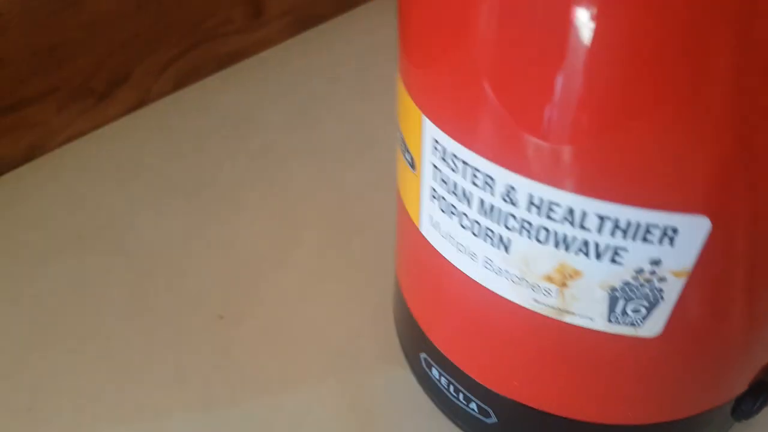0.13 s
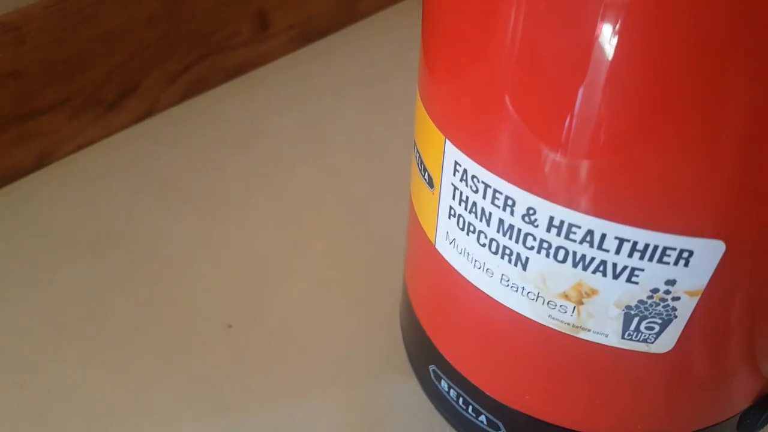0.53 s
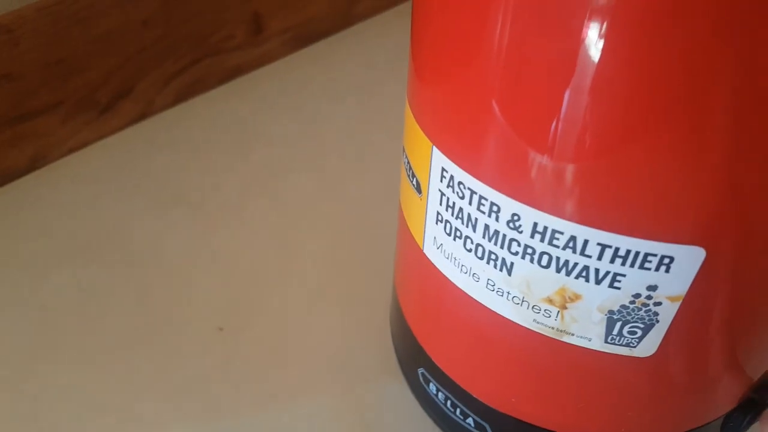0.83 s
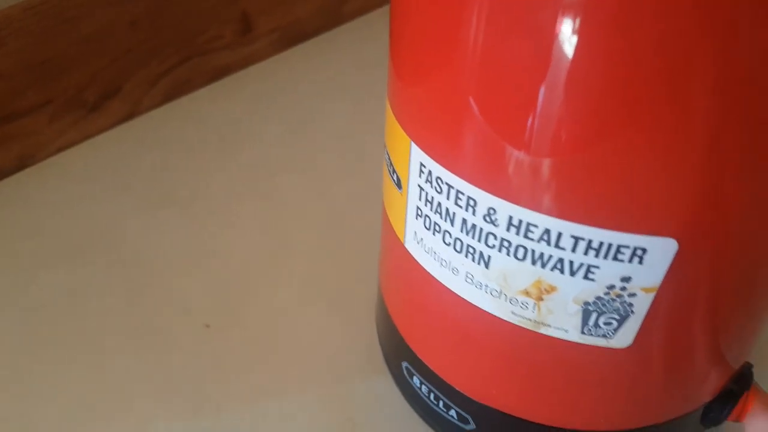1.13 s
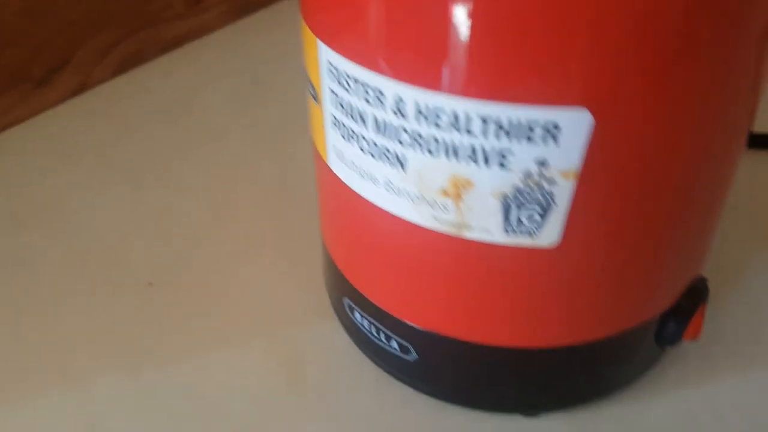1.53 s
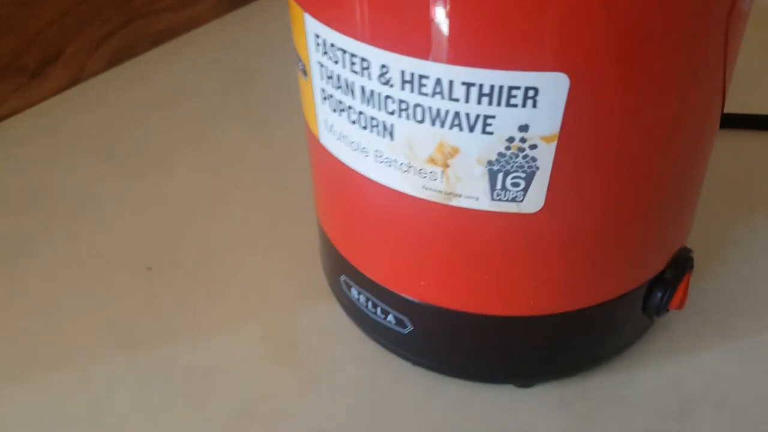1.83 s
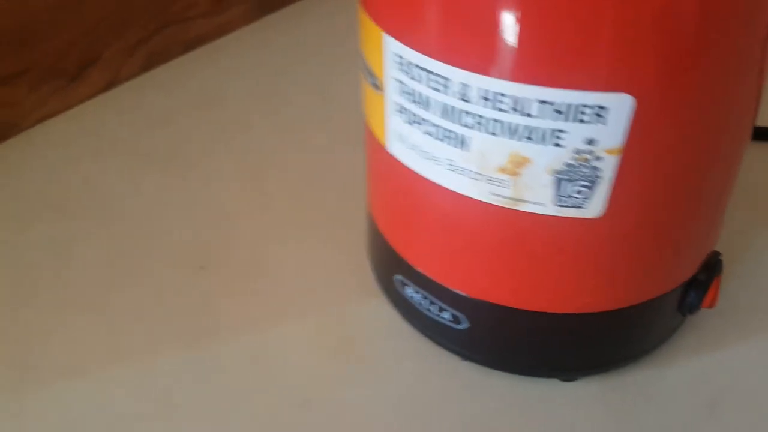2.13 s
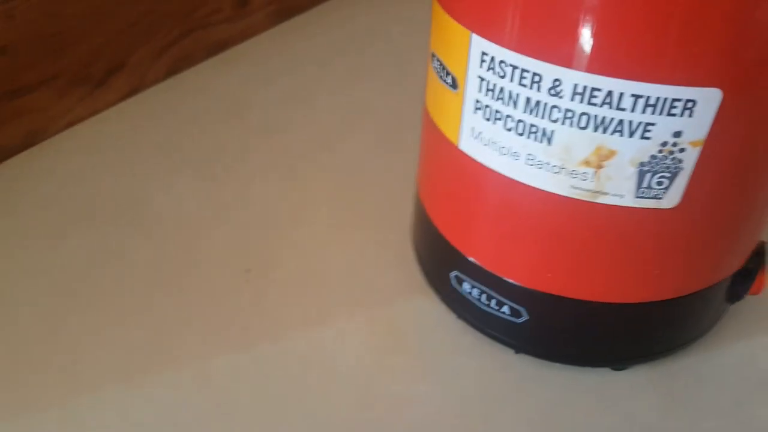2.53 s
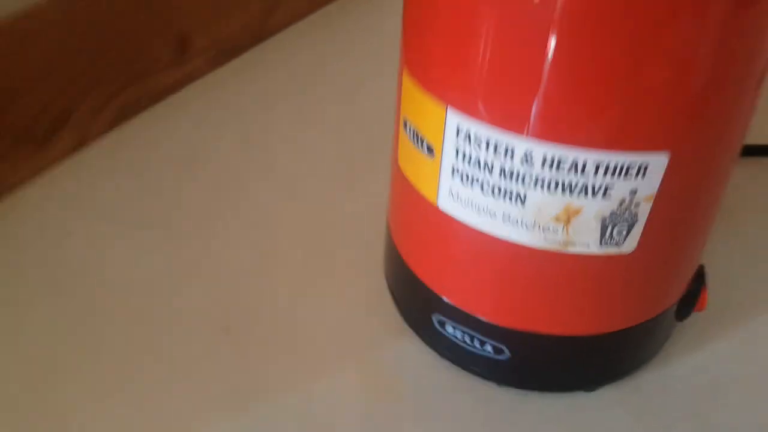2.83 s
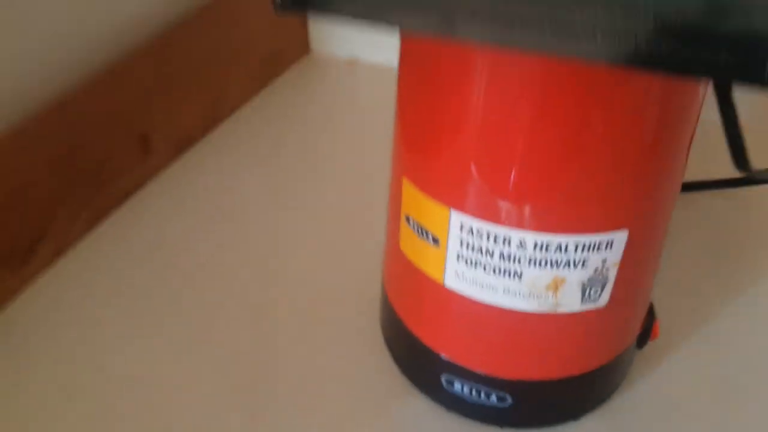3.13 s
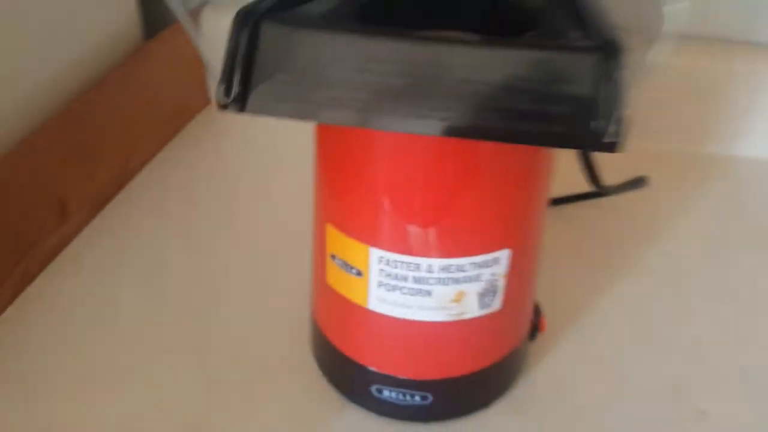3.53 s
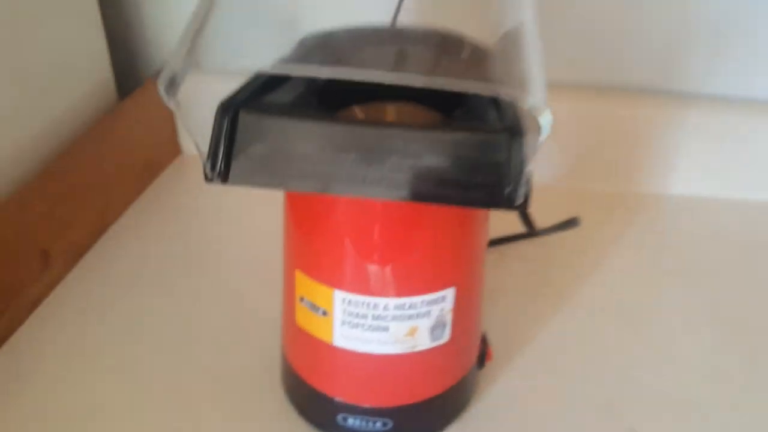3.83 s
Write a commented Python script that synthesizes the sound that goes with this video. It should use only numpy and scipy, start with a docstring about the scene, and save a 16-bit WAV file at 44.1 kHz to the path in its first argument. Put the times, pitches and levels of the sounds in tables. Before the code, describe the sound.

Close stereo phone capture of a hot-air popper: faint handling and small clicks, one hard switch snap, a rising motor whine, then steady blowing roar with swirling kernel rattle in an indoor kitchen.

```python
"""A hot-air corn popper on a kitchen counter, close to a hand-held phone. The room hums throughout (noise,
sines). A hand rubs the phone (noise swells); a finger touches the rocker switch and snaps it at 1.1 s (noise
cracks, decaying sines, echo). The motor spins up, its shaft orders (sines) climbing through the housing's
resonances; three dull bumps hit the phone; air roars through the chamber (resonant noise); kernels swirl and
rattle (gated noise). From 2.2 s the deepest bass flickers back in brief soft lumps."""
import sys
import numpy as np
from scipy import signal
from scipy.fft import rfft, irfft, next_fast_len
from scipy.io import wavfile
from scipy.ndimage import uniform_filter1d, map_coordinates

SR = 44100
rng = np.random.default_rng(int(sys.argv[2]) if len(sys.argv) > 2 else 0)


def volts_from_db(level):
    """Convert decibel levels to linear amplitude ratios."""
    exponent = np.asarray(level, float) / 20
    return 10 ** exponent


def output_pcm(signal):
    """Save a mono or channel-first signal as 16-bit PCM at the path in sys.argv[1].

    Samples are clipped to [-1, 1] before scaling.
    """
    pcm = np.clip(np.atleast_2d(signal).T, -1, 1) * 32767
    wavfile.write(sys.argv[1], SR, np.round(pcm).astype(np.int16))


N = 176400

# contacts at the switch, the last one closes it:
# (time [s], level [dB], left over right [dB], ring [dB], crack resonance [Hz], echo [dB])
TOUCHES = [(0.2347, -34.5, 11, -9.5, 4200, -25), (.629, -51, 0, 0, 2200, -24),
           (0.955, -18, -5, -27, 3640, -26), (1.0999, -8, -11, -10.5, 6130, -13.5)]
# left-right likeness of the popper: (frequency [Hz], likeness [0-1])
POPPER_ALIKE = [(60, 0.88), (150, 0.69), (380, 1), (700, 0.92), (1300, 0.56), (2400, 0.28), (5000, 0.21),
                (15000, .05)]
# left-right likeness of room and rubs: (frequency [Hz], likeness [0-1])
ROOM_ALIKE = [(60, 0.97), (240, 0.93), (950, 0.17), (3770, 0.04), (15000, 0.1)]


def unit(x):
    """Scale to rms 1."""
    return x / np.sqrt(np.mean(x ** 2) + 1e-20)


def along(points, hz):
    """Interpolate (frequency [Hz], value) points on a log frequency axis."""
    f, v = np.transpose(points)
    return np.interp(np.log(hz + 1), np.log(f + 1), v)


def curves(rows):
    """One value per sample for each column after the time."""
    s, *cols = np.transpose(rows)
    return [np.interp(np.arange(N) / SR, s, c) for c in cols]


def wobble(knots_per_s):
    """Smooth random curve through normally distributed knots."""
    knots = rng.standard_normal(int(N * knots_per_s / SR) + 40)
    return map_coordinates(knots, [np.arange(N) * knots_per_s / SR])


def filtered(x, response):
    """Apply a complex response of frequency to x."""
    m = next_fast_len(N + SR // 2)
    return irfft(rfft(x, m) * response(np.fft.rfftfreq(m, 1 / SR)), m)[..., :N]


def peaks(table):
    """Summed response of (centre [Hz], width [Hz], level [dB]) resonances."""
    return lambda f: sum(volts_from_db(db) * 1j * f * w / (c * c - f * f + 1j * f * w) for c, w, db in table)


def squared_peaks(table):
    """Resonances applied twice: steeper skirts, levels in dB doubled."""
    return lambda f: peaks(table)(f) ** 2


def colour(spectrum):
    """Response of a (frequency [Hz], level [dB]) table."""
    return lambda hz: volts_from_db(along(spectrum, hz))


def spread(pair, response, alike):
    """Colour two unrelated signals and mix them into left and right by likeness, rms 1."""
    def mid_side(hz):
        turn = np.arccos(np.clip(along(alike, hz), -1, 1)) / 2
        return response(hz) * [np.cos(turn), np.sin(turn)]
    mid, side = filtered(pair, mid_side)
    return unit(np.array([mid + side, mid - side]))


def noise():
    """Two unrelated white noises."""
    return rng.standard_normal((2, N))


def switched(rise_s):
    """0 before the switch closes, then a linear rise to 1."""
    return np.clip((np.arange(N) / SR - TOUCHES[-1][0]) / rise_s, 0, 1)


def bell(centre_s, sigma_s):
    """Gaussian swell with peak 1."""
    return np.exp(-.5 * ((np.arange(N) / SR - centre_s) / sigma_s) ** 2)


def room():
    """Low, lumpy kitchen noise and the wavering sines of a distant appliance."""
    # appliance hum: (frequency [Hz], mean level [dB rms])
    hum_tones = [(59.2, -58), (781, -63.5), (1044, -67)]
    # background spectrum, relative: (frequency [Hz], density [dB per Hz])
    room_spectrum = [(20, -28), (40, -21), (60, -14), (90, -24), (125, -5), (171, -3.5), (237, -9),
                     (310, -2), (370, -8.5), (466, -15.5), (800, -18.5), (1240, -25.5), (3550, -36),
                     (6000, -47.5), (16200, -52)]
    noise_db = -42.5
    t = np.arange(N) / SR
    hum = 0
    for hz, db in hum_tones:
        level = volts_from_db(db + 4 * wobble(9)) * np.sqrt(2)
        hum = hum + level * np.sin(2 * np.pi * hz * t + wobble(8))
    return hum + volts_from_db(noise_db + 0.4 * wobble(8.7)) * spread(noise(), colour(room_spectrum), ROOM_ALIKE)


def hand():
    """Skin friction on the phone as noise swells, dull bumps as short sine bursts."""
    # slides: (centre time [s], length, 3 sigma [s], level [dB])
    rub_events = [(0.083, 0.17, -50.5), (0.259, 0.12, -45.5), (0.422, 0.067, -50.5), (0.934, 0.035, -50),
                  (1.102, 0.015, -34)]
    # friction spectrum, relative: (frequency [Hz], density [dB per Hz])
    skin = [(500, 14.5), (1500, 5), (4000, -2), (9000, -9.5), (16000, -17)]
    # bumps: (centre time [s], pitch [Hz], level [dB], length, 3 sigma [s])
    bump_events = [(1.182, 119, -30.5, 0.028), (1.279, 112, -28, 0.027), (1.303, 49.4, -39, .04)]
    t = np.arange(N) / SR
    rub_level = sum(volts_from_db(db) * bell(s, length / 3) for s, length, db in rub_events)
    rubs = rub_level * spread(noise(), colour(skin), ROOM_ALIKE)
    bumps = sum(volts_from_db(db) * bell(s, length / 3) * np.sin(2 * np.pi * hz * (t - s))
                for s, hz, db, length in bump_events)
    return rubs + bumps


def thumps():
    """Short soft lumps of deep bass: sine bursts under Gaussian swells."""
    # (centre time [s], level [dB])
    thump_events = [(2.19, -42), (2.51, -51), (2.715, -44), (2.82, -49), (2.915, -45), (3.11, -47),
                    (3.42, -48), (3.56, -52), (3.95, -45)]
    pitch_hz, sigma_s = 52, .012
    t = np.arange(N) / SR
    return sum(volts_from_db(db) * bell(s, sigma_s) * np.sin(2 * np.pi * pitch_hz * (t - s)) for s, db in thump_events)


def switch():
    """Each contact: a lead-in tick, a noise crack, plastic modes ringing and the kitchen's noisy answer."""
    # modes of the plastic base: (frequency [Hz], level [dB], t60 [s])
    plastic = [(740, -8, .025), (1260, -3, .03), (1480, 0, .035), (1820, 0, .025), (2280, -5, .02),
               (2864, -4, .035), (3520, -2, .025), (5150, -8, .01), (6500, -6, .01)]
    # kitchen decay: (frequency [Hz], t60 [s])
    kitchen_decay = [(300, 0.15), (2500, 0.19), (8000, 0.2), (15000, 0.17)]
    # colour of the kitchen's answer: (frequency [Hz], level [dB])
    echo_colour = [(300, 7), (1200, 9.5), (2800, 11), (5000, -0.5), (9000, -2.5), (16000, -11)]
    lead_in_s, lead_in_db = 0.00143, -14.5
    crack_t60_s, resonance_db, echo_rise_s = .011, 15, 0.0012
    out, t = np.zeros((2, N + SR)), np.arange(SR // 2) / SR
    n = len(t)
    late = np.clip(t - lead_in_s, 0, None)
    crack_level = np.where(t < lead_in_s, volts_from_db(lead_in_db), volts_from_db(-60 * late / crack_t60_s))
    ring = sum(volts_from_db(db - 60 * t / t60) * np.sin(2 * np.pi * hz * t) for hz, db, t60 in plastic)
    ring = np.roll(ring, round(lead_in_s * SR))
    for s, db, pan_db, ring_db, crack_hz, echo_db in TOUCHES:
        # a shared noise plus one of its own per channel
        crack = (rng.standard_normal(n) + 0.99 * rng.standard_normal((2, n))) * crack_level
        crack = crack + volts_from_db(resonance_db) * signal.lfilter(*signal.iirpeak(crack_hz, 1.7, SR), crack)
        hz, frames, z = signal.stft(rng.standard_normal((2, n)), SR, nperseg=128)
        fade = volts_from_db(along(echo_colour, hz)[:, None] - 60 * frames / along(kitchen_decay, hz)[:, None])
        echo = signal.istft(z * fade, SR, nperseg=128)[1][:, :n]
        echo = echo * np.clip(late / echo_rise_s, 0, 1)
        hit = (0.14 * crack + volts_from_db(ring_db) * ring) * volts_from_db([[pan_db / 2], [-pan_db / 2]])
        out[:, round(s * SR):][:, :n] += volts_from_db(db) * (hit + volts_from_db(echo_db) * echo)
    # second-order high-pass at 800 Hz, first-order low-pass at 9 kHz
    return filtered(out[:, :N], lambda f: (1j * f / (800 + 1j * f)) ** 2 * 9000 / (9000 + 1j * f))


def kernels():
    """Tiny hard collisions: random decaying hits gate noise in surges over a steady hiss."""
    # swirl level before trim: (time [s], level [dB])
    swirl = [(1.24, -73), (1.54, -48.5), (1.73, -36.5), (1.83, -20.5), (1.88, -19.5), (1.9, -27),
             (1.98, -25), (2.0, -30.5), (2.06, -21), (2.08, -26.5), (2.12, -20.5), (2.17, -26), (2.19, -32),
             (2.22, -24), (3.29, -24), (3.3, -24), (3.35, -28.5), (3.49, -25.5), (3.53, -20.5),
             (3.55, -24.5), (3.65, -25), (3.67, -28.5), (3.72, -23), (3.81, -28.5), (3.82, -21),
             (3.86, -30), (3.88, -22), (4.0, -30.5)]
    # collision spectrum, relative: (frequency [Hz], density [dB per Hz])
    rattle = [(1500, -13), (2500, 1), (3400, 0), (5100, -1), (6400, -2), (8600, 2), (10100, -3),
              (13200, -3), (15700, -6.5), (16200, -11)]
    hits_per_s, hit_decay_s, hit_spread_db = 400, 0.0014, 3.5
    hiss_share, trim_db = 0.66, 0.5
    level_db, = curves(swirl)
    hits = (rng.random(N) < hits_per_s / SR) * volts_from_db(hit_spread_db * rng.standard_normal(N))
    gate = signal.lfilter([1], [1, -np.exp(-1 / (hit_decay_s * SR))], hits)
    surge_db = .3 * wobble(18) + 1.9 * wobble(80)
    rattling = unit(gate * volts_from_db(surge_db))
    grit = noise() * (hiss_share + (1 - hiss_share) * rattling) * volts_from_db(.5 * surge_db)
    return switched(0.13) * volts_from_db(level_db + trim_db) * spread(grit, colour(rattle), POPPER_ALIKE)


def air():
    """Turbulent flow: broad noise roar and noise through the resonances that the flow excites."""
    # levels before trims:
    # (time [s], roar [dB], chamber tone [dB], housing ring [dB], spout tone [dB])
    air_levels = [(1.22, -43, -62, -58, -43), (1.24, -51, -60, -33, -42), (1.37, -40, -30, -46, -30),
                  (1.42, -36, -38.5, -33, -33), (1.51, -30.5, -26, -23, -27.5), (1.6, -27, -29, -17.5, -23),
                  (1.64, -23.5, -21.5, -16, -25.5), (1.85, -21.5, -28, -19.5, -28.5),
                  (1.98, -21, -24.5, -18.5, -25), (2.02, -21.5, -26, -21.5, -39),
                  (2.47, -20.5, -27, -30, -30), (3.16, -21.5, -31.5, -23, -21.5),
                  (3.57, -22, -37, -21.5, -18), (3.62, -23, -51, -27, -20), (3.93, -23, -42, -22.5, -20),
                  (4.0, -24, -54, -24, -22)]
    # roar spectrum, relative: (frequency [Hz], density [dB per Hz])
    roar_spectrum = [(41, -60), (70, -13.5), (122, -14.5), (259, -16.5), (360, -10), (490, -5), (618, 4),
                     (793, -4.5), (857, 3), (1240, 0.5), (1960, -7), (2160, -5.5), (3400, -7.5),
                     (5000, -12.5), (7000, -19), (9100, -22), (15400, -56)]
    # resonances, relative: (centre [Hz], width [Hz], level [dB]); all but the duct's get squared
    duct_modes = [(735, 16, 2), (925, 20, 1.5), (1160, 50, -5)]
    chamber_modes = [(366.7, 38.4, -3.5), (425, 120, -1.5)]
    ring_modes = [(1532, 41, 18.5), (1666, 520, 21.5)]
    spout_modes = [(543.3, 14, -5.5), (603, 172, 5.5)]
    # trims
    flow_db, roar_db, duct_db = -4.0, 4.5, -0.5
    chamber_db, ring_db, spout_db = -1.5, -7.5, -5
    flow_curve, chamber_curve, ring_curve, spout_curve = curves(air_levels)
    roar = volts_from_db(roar_db + 0.0) * volts_from_db(0) * spread(noise(), colour(roar_spectrum), POPPER_ALIKE)
    roar = roar * volts_from_db(20 * np.log10(volts_from_db(0.1 * wobble(5.3) * 20 / 20)))
    duct = volts_from_db(duct_db + wobble(4.57)) * spread(noise(), peaks(duct_modes), POPPER_ALIKE)
    chamber = volts_from_db(chamber_curve + chamber_db) * spread(noise(), squared_peaks(chamber_modes), POPPER_ALIKE)
    ring = volts_from_db(ring_curve + ring_db) * spread(noise(), squared_peaks(ring_modes), POPPER_ALIKE)
    spout = volts_from_db(spout_curve + spout_db) * spread(noise(), squared_peaks(spout_modes), POPPER_ALIKE)
    return switched(0.17) * (volts_from_db(flow_curve + flow_db) * (roar + duct) + chamber + ring + spout)


def motor():
    """Unsteady sines on the shaft orders, weighted by the housing's resonances, plus mains buzz."""
    # shaft speed: (time [s], speed [turns/s])
    shaft_speed = [(1.1, 10), (1.17, 40), (1.24, 63), (1.3, 85), (1.35, 101), (1.49, 146), (1.59, 171),
                   (1.69, 189), (1.79, 198), (1.95, 203.3), (2.21, 206.7), (2.51, 208.4), (2.91, 209.9),
                   (4, 211)]
    # shaft orders: (multiple of shaft speed, relative level [dB])
    shaft_orders = [(1, -40), (2, -36), (3, -40), (4, -35), (5, -33.5), (6, -28.5), (7, -34.5), (8, -43),
                    (9, -39.5), (10, -35), (11, -44), (15, -42), (25, -33)]
    # what the housing lets through: (frequency [Hz], level [dB])
    housing = [(60, -51), (110, 7.5), (190, -1), (215, -12), (370, -5), (620, 3), (760, -6), (920, 3),
               (1010, -5), (1200, 3), (1400, -5), (1540, 9), (1640, 3), (1760, 9.5), (1950, 1), (2130, 7),
               (2450, -6), (5000, -45)]
    # whine level: (time [s], orders up to 5 [dB], orders 6 and 7 [dB], higher orders [dB])
    whine_levels = [(1.15, -19, -25, -34), (1.35, -11, -18, -18), (1.48, -5, -10, -2), (1.6, -1, -12, 3),
                    (1.74, -1, 1.5, -3), (2, -3, 1, -8), (2.5, 0, 2, -6), (2.9, -1, -2, -10),
                    (3.3, 3, -4, -10), (3.7, 2, -1.5, -11), (4, 0, -2, -11)]
    # mains buzz at final speed: (frequency [Hz], mean level [dB rms])
    buzz_tones = [(120, -47), (240, -56)]
    waver_db, jitter_rad = 1.8, .27
    speed, = curves(shaft_speed)
    low_db, mid_db, high_db = curves(whine_levels)
    turns, t = np.cumsum(speed) / SR, np.arange(N) / SR
    whine = 0
    for k, db in shaft_orders:
        group_db = low_db if k < 6 else mid_db if k < 8 else high_db
        unsteady_db = waver_db * wobble(9) + .5 * waver_db * wobble(30)
        level = volts_from_db(db + group_db + along(housing, k * speed) + unsteady_db)
        jitter = jitter_rad * (wobble(10) + wobble(60))
        whine = whine + level * np.sin(2 * np.pi * k * turns + jitter)
    buzz = sum(volts_from_db(db + 0.47 * wobble(9.26)) * np.sin(2 * np.pi * hz * t) for hz, db in buzz_tones)
    buzz = buzz * speed / speed[-1]
    return np.sqrt(2) * switched(0.063) * (whine + buzz) * np.ones((2, 1))


def scene():
    """The popper sits off centre: level and phase differ between the two microphones."""
    # (frequency [Hz], left over right [dB])
    sides = [(60, -5), (200, 2.5), (380, -2.5), (700, 3), (1290, 0), (2400, 1.5), (5000, -1), (9000, -1),
             (15000, 2)]
    # (frequency [Hz], phase by which left leads [rad])
    lead = [(100, 0.17), (600, 1.3), (950, 0.36), (1200, 1.5), (1460, 0.79), (4400, 1.26), (16000, 2)]
    half = np.array([[.5], [-.5]])
    popper = filtered(motor() + air() + kernels(),
                      lambda hz: volts_from_db(half * along(sides, hz)) * np.exp(1j * half * along(lead, hz)))
    return popper + switch() + room() + hand()


def top_cut(x):
    """Nothing passes above the cut-off."""
    return signal.sosfilt(signal.butter(12, 16670, fs=SR, output="sos"), x)


def record(dry):
    """While the sound is steady and loud the deep bass drops away; the top is cut and peaks clip softly."""
    low_cut_hz, low_cut_db, loud_db = 85, -24, -23
    top_hz, clip_level = 15850, .9
    power = np.abs(uniform_filter1d(np.mean(dry ** 2, 0), size=6000))
    # 0 when quiet, 0.5 at loud_db, 1 when loud
    loud = power ** 2 / (power ** 2 + volts_from_db(4 * loud_db))
    deep = filtered(dry, lambda hz: 1 / (1 + (hz / low_cut_hz) ** 8))
    removed_bass = deep * (1 - volts_from_db(low_cut_db * loud))
    mix = filtered(dry, lambda hz: hz < top_hz) - removed_bass + thumps()
    clipped = mix / (1 + np.abs(mix / clip_level) ** 10) ** (1 / 10)
    return top_cut(clipped)


dry = scene()
out = record(dry)
output_pcm(out)
```